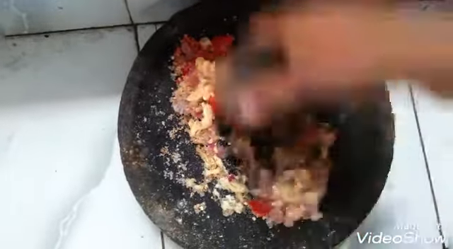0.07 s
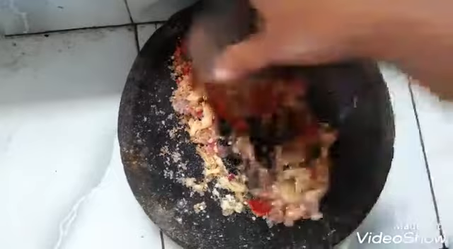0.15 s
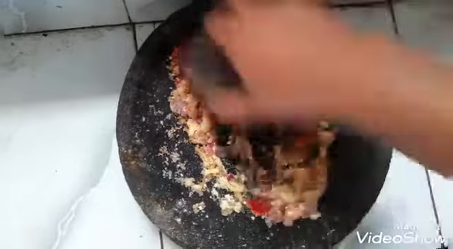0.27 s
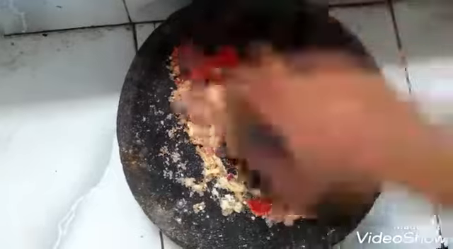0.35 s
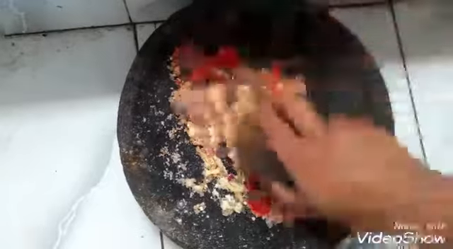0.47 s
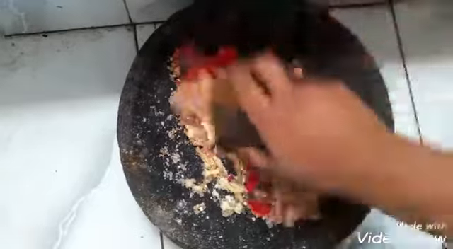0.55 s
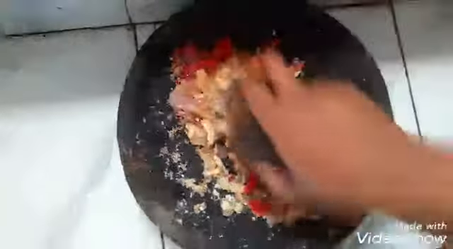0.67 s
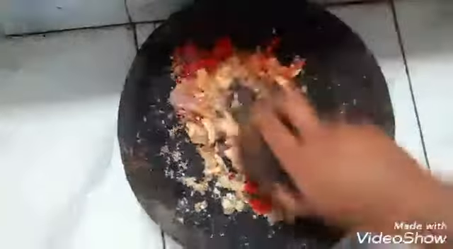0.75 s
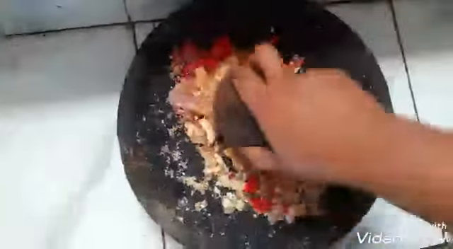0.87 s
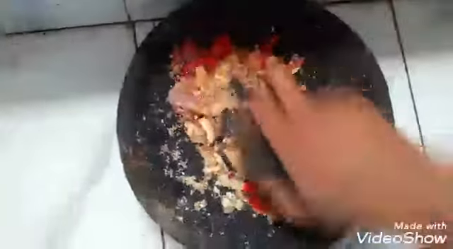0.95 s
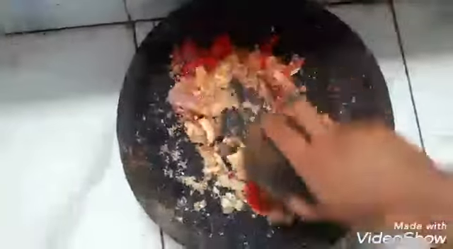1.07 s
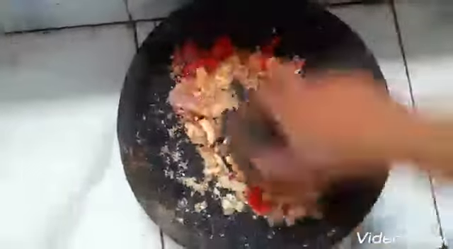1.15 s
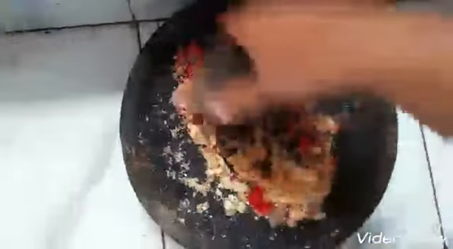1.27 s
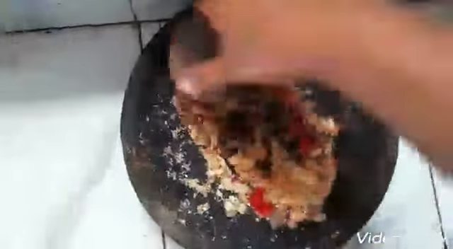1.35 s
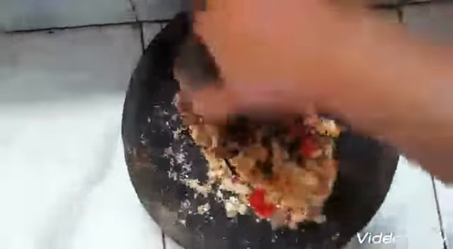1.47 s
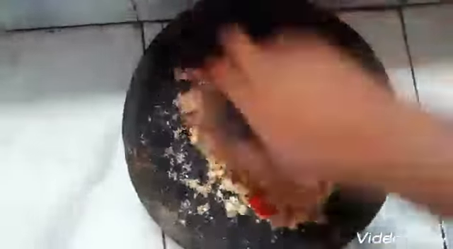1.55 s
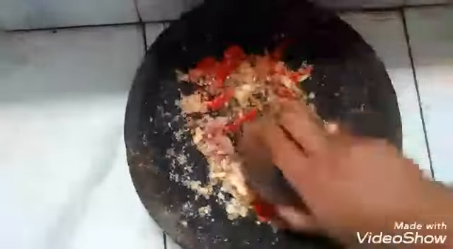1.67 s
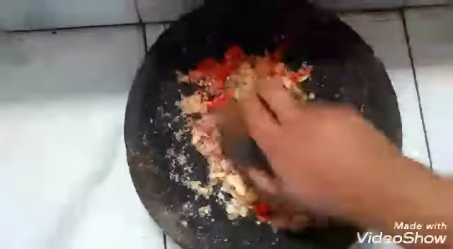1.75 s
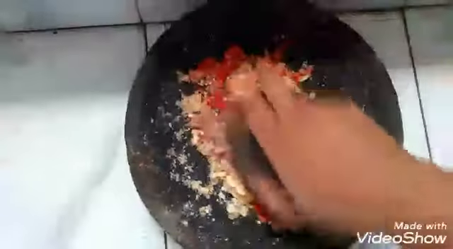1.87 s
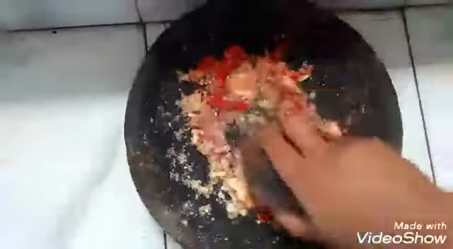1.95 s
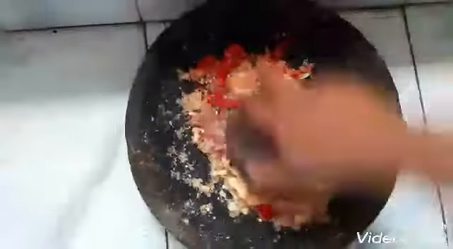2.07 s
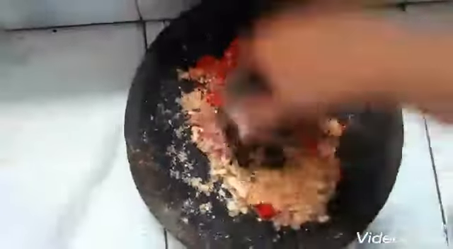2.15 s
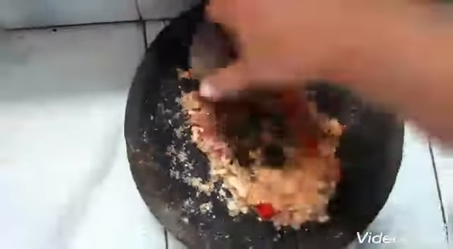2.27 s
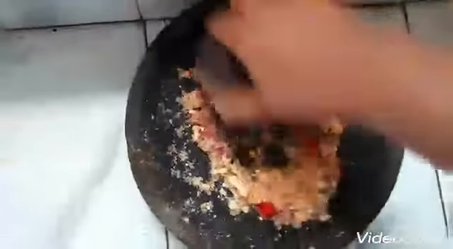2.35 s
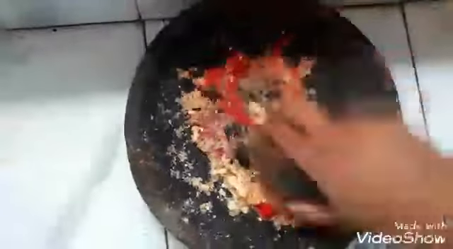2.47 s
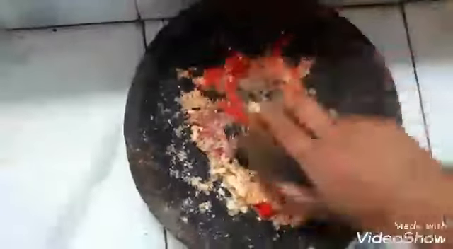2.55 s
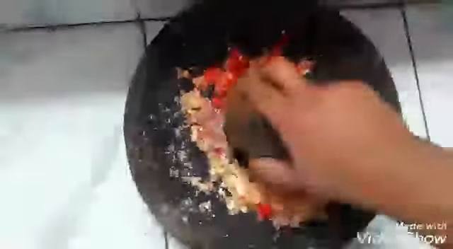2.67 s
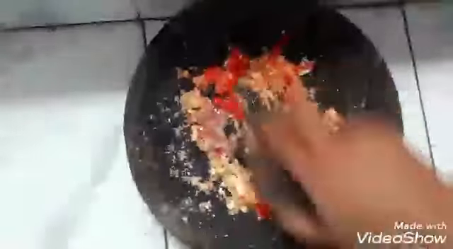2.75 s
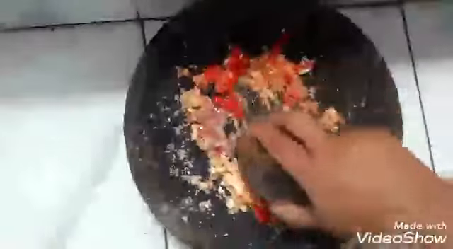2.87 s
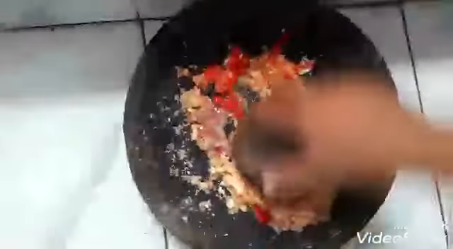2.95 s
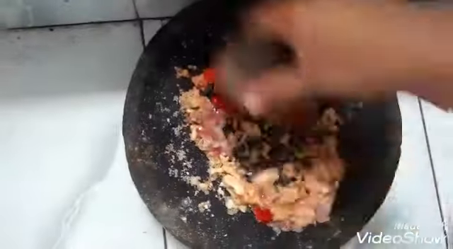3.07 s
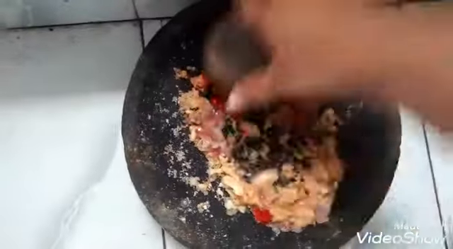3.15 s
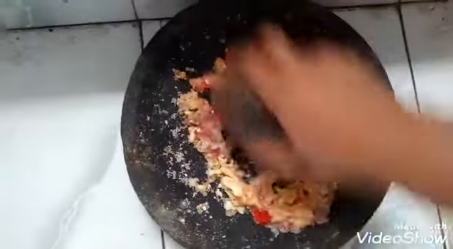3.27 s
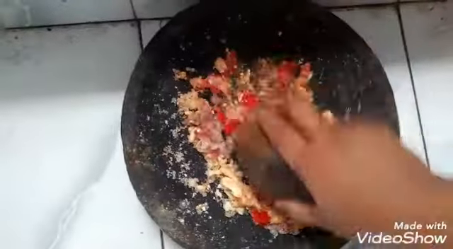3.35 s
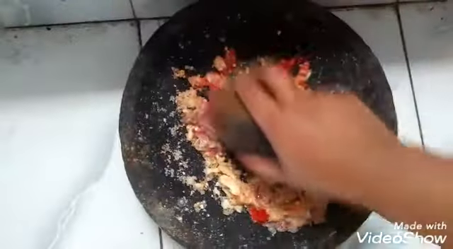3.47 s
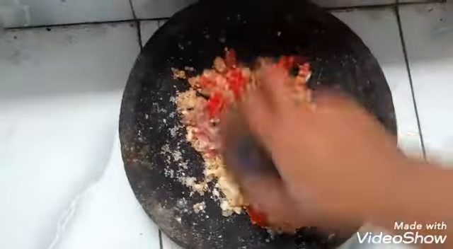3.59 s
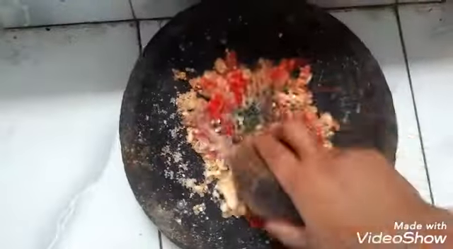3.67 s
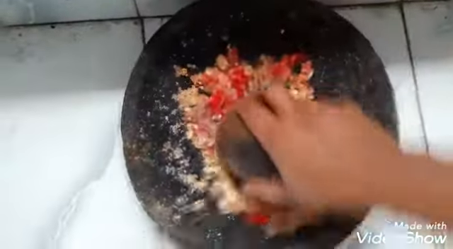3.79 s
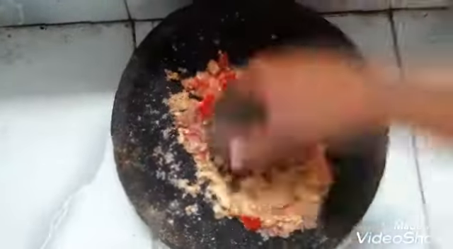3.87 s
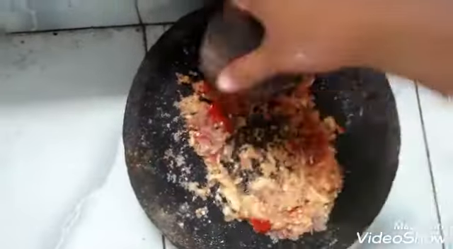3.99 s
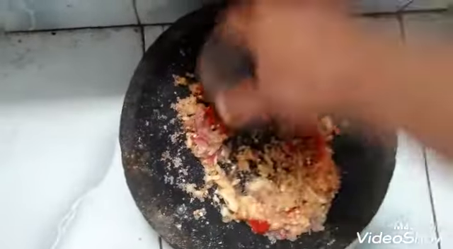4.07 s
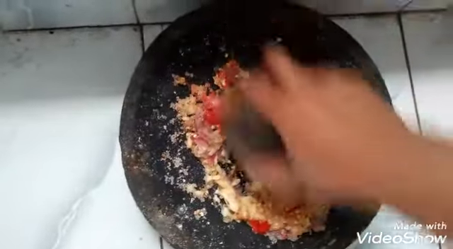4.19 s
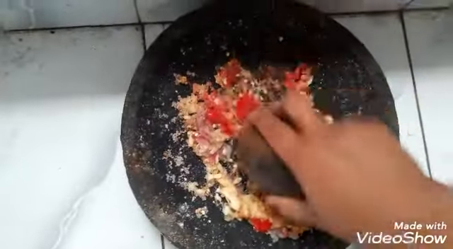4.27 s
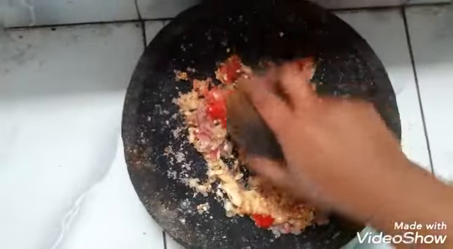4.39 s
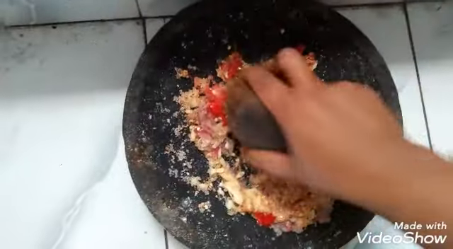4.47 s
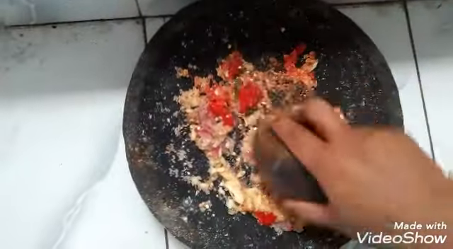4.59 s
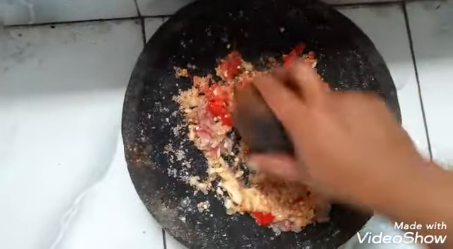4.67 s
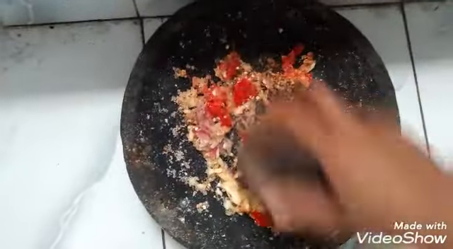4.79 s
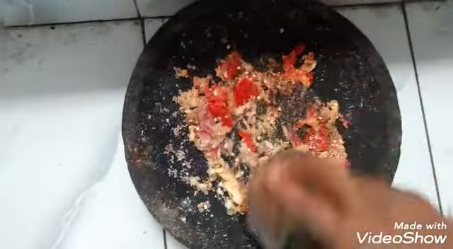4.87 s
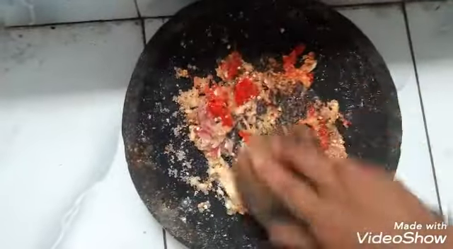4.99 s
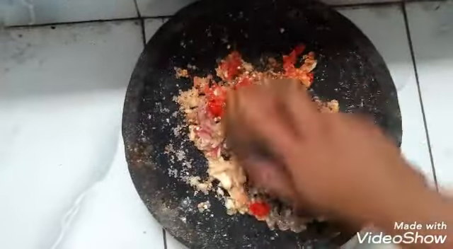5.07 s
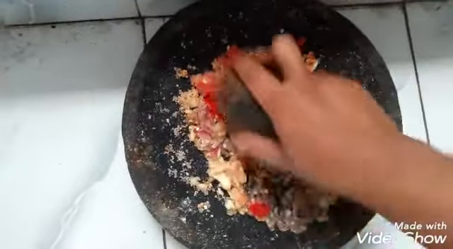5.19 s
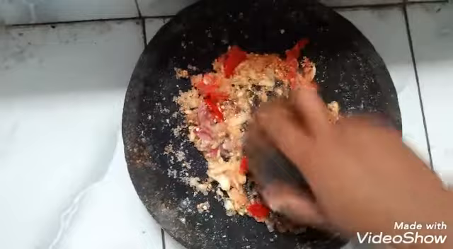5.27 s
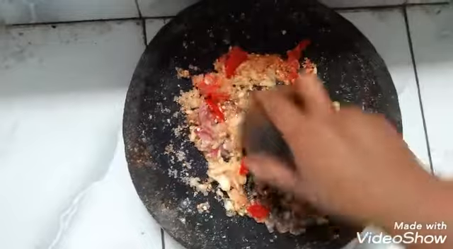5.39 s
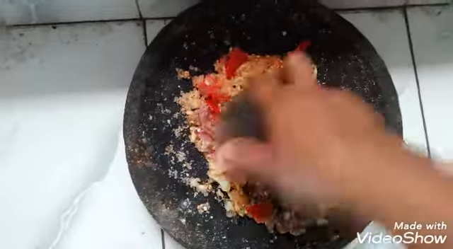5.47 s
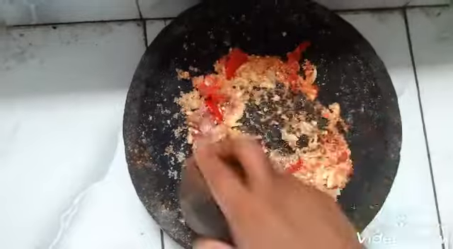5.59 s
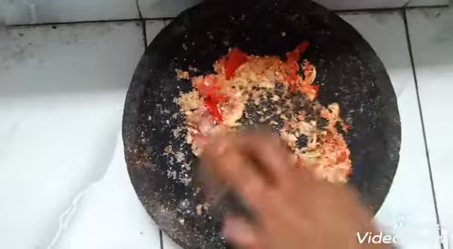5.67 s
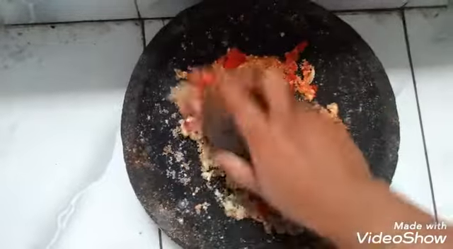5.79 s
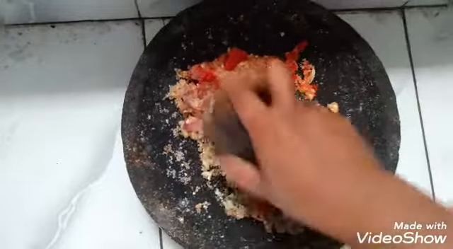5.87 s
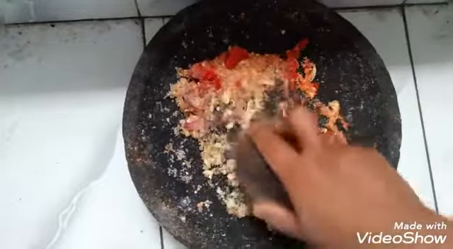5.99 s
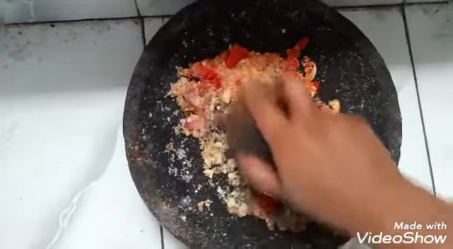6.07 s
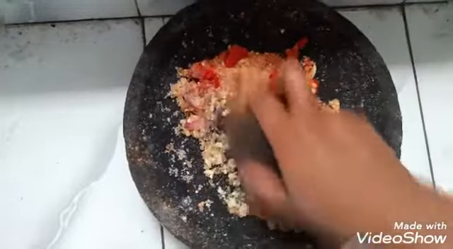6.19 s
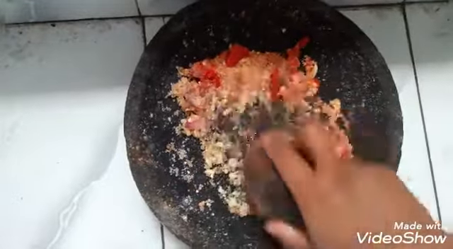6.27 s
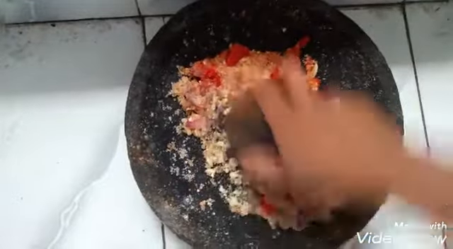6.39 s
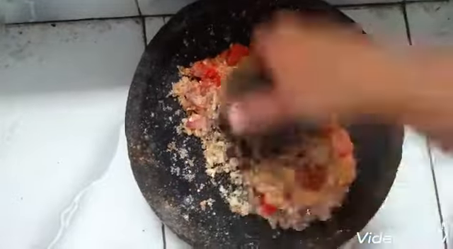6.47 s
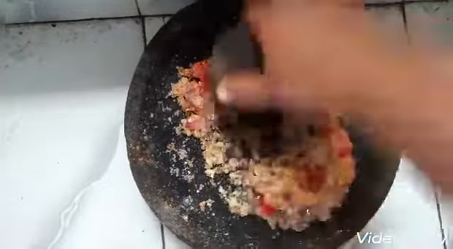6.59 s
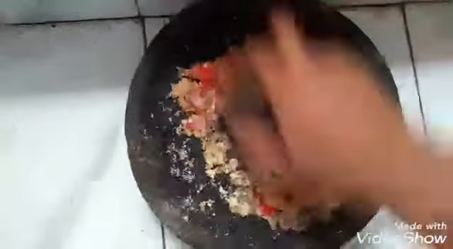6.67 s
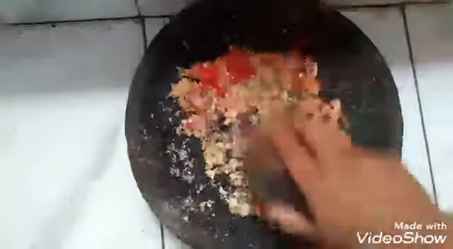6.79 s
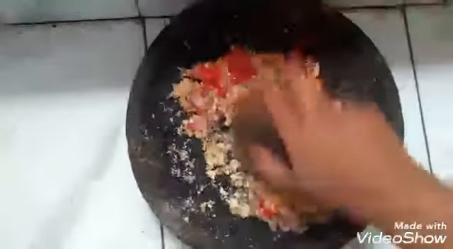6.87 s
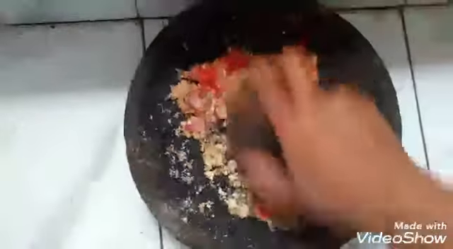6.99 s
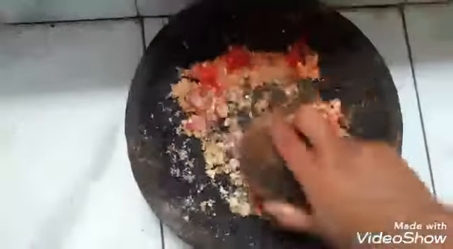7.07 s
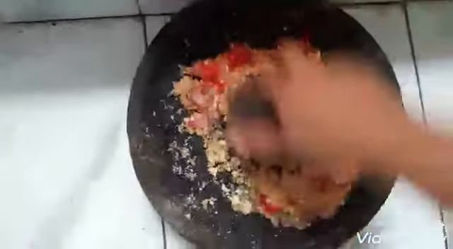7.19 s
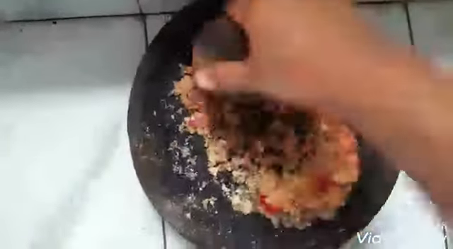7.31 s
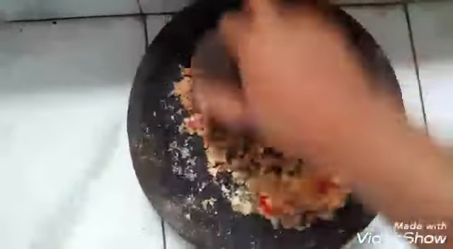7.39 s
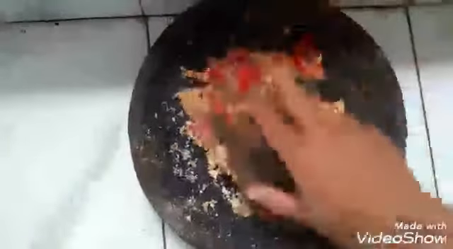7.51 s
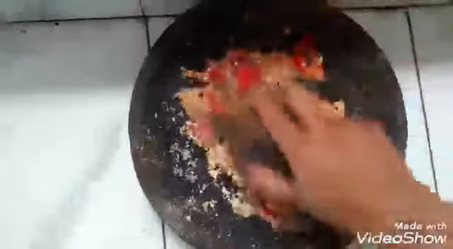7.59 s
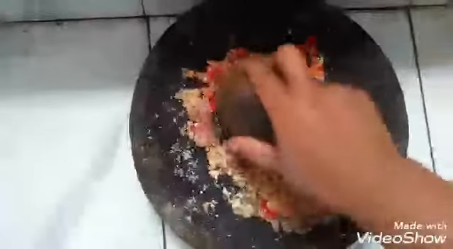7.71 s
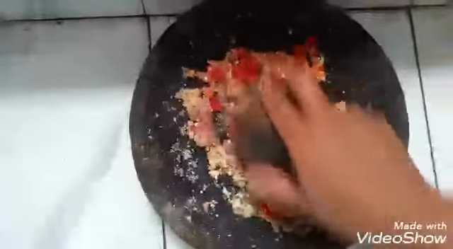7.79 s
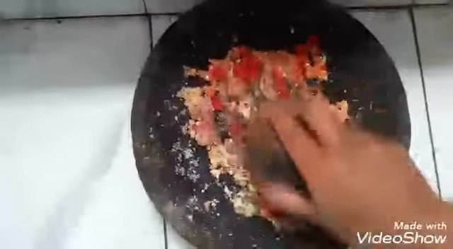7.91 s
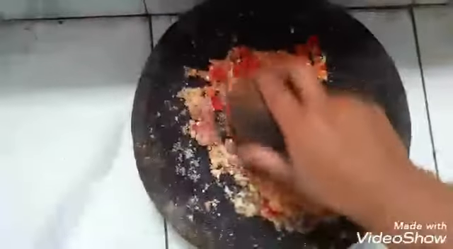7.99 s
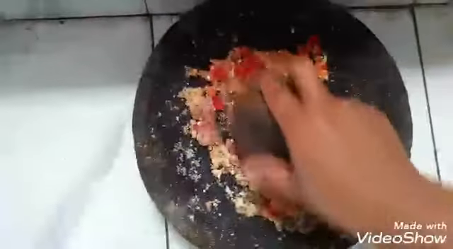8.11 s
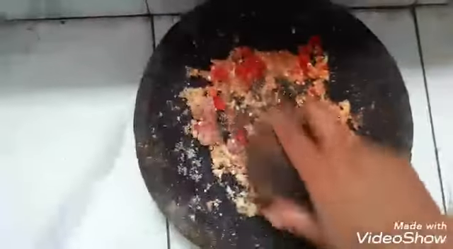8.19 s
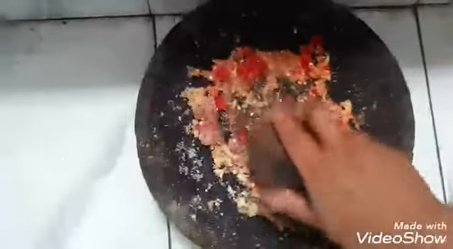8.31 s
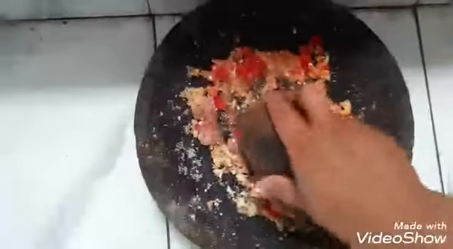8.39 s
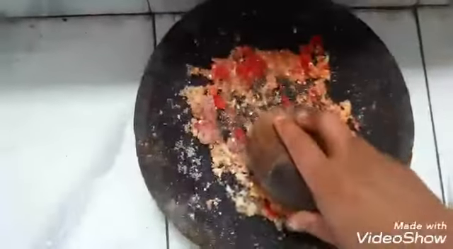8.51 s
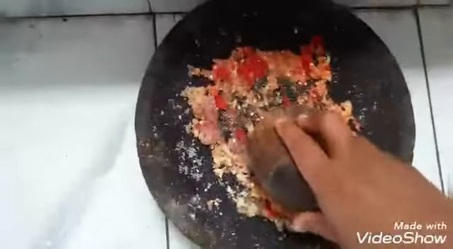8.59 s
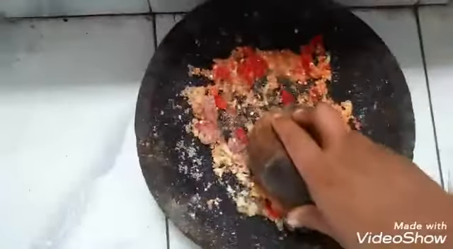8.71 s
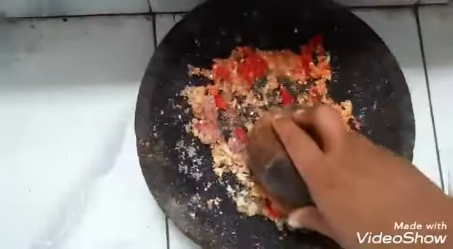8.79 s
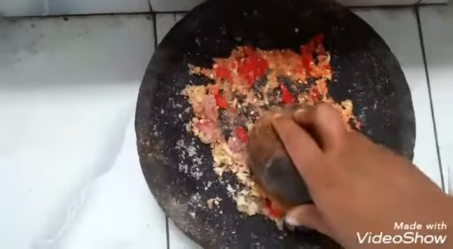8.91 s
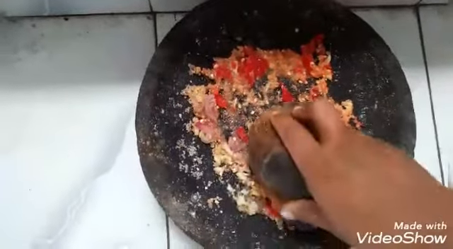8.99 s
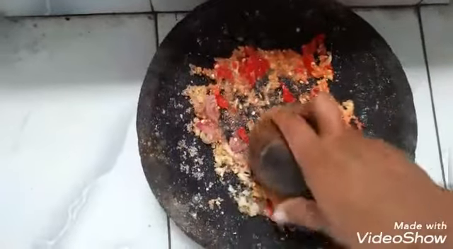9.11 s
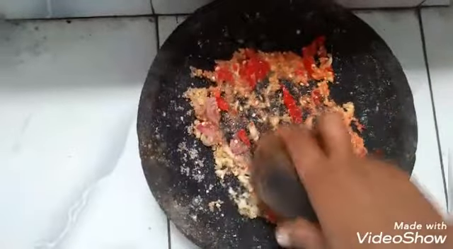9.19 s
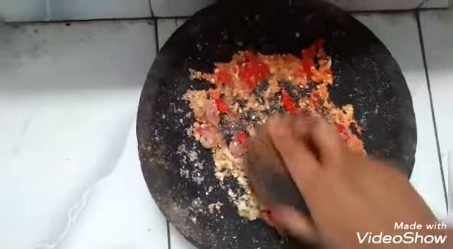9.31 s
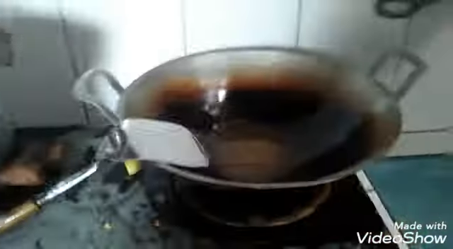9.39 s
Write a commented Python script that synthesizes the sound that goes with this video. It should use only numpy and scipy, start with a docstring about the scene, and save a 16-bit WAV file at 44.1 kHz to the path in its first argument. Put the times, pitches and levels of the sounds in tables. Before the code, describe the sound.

Close by, a hand-held stone pestle drags over a flat stone mortar on a tiled floor. Gritty rasping strokes start at once, several per second, mixed with short dull knocks and tiny cracking seeds. The uneven rhythm continues until about 8.5 seconds, then fades to faint scrapes. A wavering distant engine and thin hiss lie underneath, in a small, lightly reverberant room.

```python
"""A stone pestle grinds chilies on a flat stone mortar that stands on a tiled floor, heard from close by.
From the start a far engine (wavering hum over band noise) and a faint hiss lie under everything. The pestle
drags at once: random grains rasp, fizz and drive the mortar's modes. Then come dull knocks (short contacts
ringing those modes) and cracking seeds (crunch bursts with a short ring), repeating until, after some 8.5 s,
the grinding weakens; the hiss dips briefly near 9.1 s. The recorder limits the knocks."""
import sys
import numpy as np
from scipy import signal
from scipy.fft import rfft, irfft
from scipy.io import wavfile
from scipy.ndimage import uniform_filter1d, minimum_filter1d

SR = 44100
rng = np.random.default_rng(int(sys.argv[2]) if len(sys.argv) > 2 else 0)


def master_out(mix):
    """Clip the mix to full scale and print it as 16-bit PCM to the path in sys.argv[1]."""
    frames = np.transpose(np.atleast_2d(mix))
    ceiling = np.clip(frames, -1, 1)
    pcm = np.round(ceiling * 32767).astype(np.int16)
    wavfile.write(sys.argv[1], SR, pcm)


N = 416744

# modes of the mortar on the tiles: f/Hz, relative level/dB, t60 when ringing freely/s
MORTAR_MODES = [(45, -37.5, 0.029), (173, -20, 0.086), (241, -17, 0.064), (295.3, -16, 0.098),
                (422.7, -14, 0.07), (440, -5, 0.072), (550, -8.5, 0.12), (587, -5, 0.13), (702, -6, 0.059),
                (737, 1.5, 0.058), (901, 7.5, 0.043), (971.5, -8, 0.066), (959.6, -1.5, 0.081),
                (1149, 5, 0.014), (1356, 1.5, 0.049), (1398.4, 5.5, 0.047), (1443, 4, 0.072),
                (1506, -7.5, 0.069), (1620, -35, 0.018), (1805, -7.5, 0.009), (2072, -19.5, 0.09),
                (2290, -20, 0.012), (2615, -22.5, 0.014), (3200, -11, 0.0094), (3150, -43, 0.056)]


def from_db(db):
    """Level to amplitude: 20 dB make a factor of ten."""
    return 10 ** (np.asarray(db) / 20)


def rms_one(x):
    """Normalisation of mean power: scale to rms 1."""
    return x / np.sqrt(np.mean(x ** 2) + 1e-20)


def at_hz(points, hz):
    """Logarithmic frequency scale: read levels in dB between the points of a spectrum."""
    point_hz, level_db = np.array(points)[:, 0], np.array(points)[:, 1]
    return np.interp(np.log(hz), np.log(point_hz), level_db)


def in_time(rows):
    """Linear interpolation: each column of a curve at every sample."""
    s, *columns = np.transpose(rows)
    return [np.interp(np.arange(N) / SR, s, column) for column in columns]


def drift(rate_hz):
    """Low-passed chance: noise twice through a one-pole filter, computed every 20 samples; rms 1."""
    pole = np.exp(-40 * np.pi * rate_hz / SR)
    noise = rng.standard_normal(N // 20 + 2002)
    slow = signal.lfilter([1], [1, -2 * pole, pole * pole], noise)[2000:]   # the filter has settled
    return np.interp(np.arange(N) / 20, np.arange(len(slow)), rms_one(slow))


def ring(clicks, hz, t60):
    """Damped resonator: a unit click sets off a decaying sine of initial height 1."""
    radius, angle = from_db(-60 / (t60 * SR)), 2 * np.pi * hz / SR
    feedback = [1, -2 * radius * np.cos(angle), radius * radius]
    return signal.lfilter([0, np.sin(angle)], feedback, clicks + 1e-18)


def grains(per_s, spread_db):
    """Poisson-like impulse noise: random clicks of uneven size and sign; rms 1."""
    sizes = from_db(spread_db * np.minimum(rng.exponential(1, N), 5)) * rng.choice([-1, 1], N)
    return rms_one(sizes * (rng.random(N) < per_s / SR))


def coloured(x, spectrum, patchy_db):
    """Filter bank: bands of about a third octave, each with its level and its own flicker; rms 1."""
    low_end, high_end = spectrum[0][0], spectrum[-1][0]
    count = int(3 * np.log2(high_end / low_end)) + 2
    edges = np.geomspace(low_end, min(high_end, .45 * SR), count)
    out = 0
    for k, (low, high) in enumerate(zip(edges, edges[1:])):
        band = signal.sosfilt(signal.butter(2, [low, high], "band", fs=SR, output="sos"), x)
        level_db = at_hz(spectrum, np.sqrt(low * high)) + patchy_db * drift(7.6)
        out = out + (-1) ** k * band * from_db(level_db)
    return rms_one(out)


def far_engine():
    """Harmonic and noise radiation: partials of a wavering hum over a low coloured rumble."""
    # the engine's course: t/s, hum f/Hz, hum level/dB, rumble level/dB
    engine_course = [(0.0, 84, -73, -67), (0.23, 101.8, -62.5, -65.5), (0.63, 94, -53, -60),
                     (1.02, 100, -60, -61), (1.92, 91.5, -68.5, -73), (2.13, 103.6, -74, -63),
                     (2.47, 92.7, -79, -61), (2.68, 103.3, -58, -58), (2.84, 93.2, -68.5, -65),
                     (3.39, 95.4, -53, -60), (3.5, 100, -74, -64.5), (4.16, 87.3, -56.5, -55.5),
                     (4.74, 86.8, -69, -67.5), (7.27, 93.6, -74.5, -70), (7.82, 86.7, -70, -61),
                     (8.08, 93.6, -63, -65.5), (9.29, 86.1, -68, -66.5), (9.45, 93.6, -89, -76)]
    # partials of the hum: multiple of the hum frequency, mean level/dB
    hum_partials = [(1, 1.5), (1.5, -4.5), (2, -16.5)]
    # far rumble: f/Hz, level per Hz/dB
    ambient_spectrum = [(25, 0), (60, -20.5), (90, 4), (115, 1), (140, 9.5), (170, 5.5), (220, -10.5),
                        (350, -12.5), (800, -24), (2600, -25), (4500, -55)]
    hum_hz, hum_db, rumble_db = in_time(engine_course)
    phase = 2 * np.pi * np.cumsum(hum_hz * (1 + .03 * drift(5))) / SR
    hum = sum(from_db(level_db + 5 * drift(7)) * np.sin(multiple * phase)
              for multiple, level_db in hum_partials)
    low_noise = coloured(rng.standard_normal(N), ambient_spectrum, patchy_db=1.0)
    return from_db(hum_db) * hum + from_db(rumble_db) * low_noise


def faint_hiss():
    """Broadband noise: a coloured treble whose level follows a curve."""
    # hiss: f/Hz, level per Hz/dB
    hiss_spectrum = [(6500, -42), (8200, -11), (9500, 2), (12000, -7.5), (13000, -20)]
    # its course: t/s, level/dB
    hiss_course = [(0, -65.5), (4, -64), (8.5, -62), (8.9, -69), (9.1, -84.5), (9.3, -64), (9.45, -69.5)]
    return from_db(*in_time(hiss_course)) * coloured(rng.standard_normal(N), hiss_spectrum, patchy_db=2)


def drag():
    """Sliding friction: grit, rasp and rumbling follow the leaning half-sine speed of every stroke."""
    # pushes, pulls and brief skids of the pestle: start t/s, length/s,
    # then at full speed: fine grit level/dB, rasp level/dB, mortar rumbling level/dB
    stroke_table = [(-0.025, 0.073, -41.5, -34, -36), (0.013, 0.18, -46, -40, -45.5),
                    (0.038, 0.2, -58.5, -47.5, -40.5), (0.344, 0.036, -52, -41.5, -34.5),
                    (0.383, 0.26, -43, -39, -38.5), (0.47, 0.042, -31.5, -37, -48),
                    (0.61, 0.16, -37.5, -35, -34.5), (0.778, 0.15, -40.5, -33, -35),
                    (0.933, 0.16, -40.5, -36, -29), (1.099, 0.14, -36, -31, -37.5),
                    (1.208, 0.2, -43.5, -39.5, -38), (1.376, 0.043, -72, -67, -54),
                    (1.536, 0.032, -48.5, -51, -31), (1.62, 0.255, -38.5, -37, -34.5),
                    (1.78, 0.054, -32, -28.5, -44.5), (1.837, 0.21, -42, -36, -36.5),
                    (1.954, 0.048, -32, -35.5, -43.5), (2.025, 0.15, -39, -31.5, -32.5),
                    (2.149, 0.14, -41, -36, -35.5), (2.428, 0.091, -57, -51, -39),
                    (2.433, 0.016, -41.5, -57, -39), (2.503, 0.225, -38.5, -36, -40.5),
                    (2.702, 0.158, -37, -35, -31.5), (2.783, 0.029, -29.5, -32, -38),
                    (2.848, 0.16, -43, -38, -45), (2.99, 0.16, -46.5, -39.5, -38),
                    (3.294, 0.056, -49, -41, -35), (3.344, 0.099, -52, -50, -30.5),
                    (3.39, 0.2, -39.5, -33, -41.5), (3.577, 0.14, -40, -33, -30),
                    (3.726, 0.14, -38, -33.5, -36), (3.844, 0.2, -44, -38.5, -32.5),
                    (3.991, 0.043, -46, -49, -50), (4.164, 0.033, -66.5, -44, -36.5),
                    (4.213, 0.27, -42, -36.5, -37.5), (4.458, 0.17, -41.5, -35.5, -35.5),
                    (4.645, 0.14, -41, -35.5, -41), (4.75, 0.19, -39.5, -34.5, -37),
                    (4.925, 0.071, -56, -54, -47), (5.079, 0.055, -61, -54.5, -20),
                    (5.153, 0.046, -47, -41.5, -46), (5.176, 0.21, -41.5, -39.5, -34),
                    (5.293, 0.032, -42.5, -52, -47.5), (5.381, 0.18, -43.5, -38.5, -38),
                    (5.523, 0.16, -42.5, -36, -35), (5.767, 0.033, -51, -41.5, -46.5),
                    (5.792, 0.26, -46, -37, -33.5), (5.878, 0.16, -44.5, -60, -45),
                    (6.036, 0.181, -44, -36, -40.5), (6.197, 0.14, -39, -31.5, -30),
                    (6.345, 0.14, -40.5, -34, -33.5), (6.494, 0.13, -41.5, -34, -31),
                    (6.738, 0.071, -46.5, -40.5, -45.5), (6.827, 0.16, -39.5, -35.5, -34),
                    (6.976, 0.16, -44, -37, -35.5), (7.138, 0.14, -41.5, -34, -34),
                    (7.277, 0.14, -43, -35, -34), (7.487, 0.27, -45, -39.5, -45),
                    (7.5, 0.02, -44, -43.5, -28), (7.615, 0.08, -42, -40, -42),
                    (7.728, 0.16, -41, -34.5, -34.5), (7.894, 0.16, -47, -35.5, -43.5),
                    (8.082, 0.12, -41.5, -31.5, -35), (8.221, 0.2, -48, -40, -51.5),
                    (8.429, 0.13, -50, -46.5, -35), (8.55, 0.27, -66, -56.5, -66),
                    (8.673, 0.067, -62, -53, -71), (8.803, 0.075, -73, -64, -51),
                    (8.88, 0.25, -94, -70, -66), (9.173, 0.055, -65, -52.5, -54.5),
                    (9.301, 0.16, -58, -49.5, -67)]
    speed_power = 1.2   # amplitude follows the speed of the stroke to this power
    onset_skew = 0.97   # below 1 the stroke reaches full speed before its middle
    power = np.full((3, N), 1e-10)
    for start, length, *levels_db in stroke_table:
        i = np.arange(max(round(start * SR), 0), min(round((start + length) * SR), N))
        progress = np.clip((i / SR - start) / length, 0, 1)
        speed = np.sin(np.pi * progress ** onset_skew)
        power[:, i] += (from_db(levels_db)[:, None] * np.abs(speed) ** speed_power) ** 2
    return 10 * np.log10(power)


def contact():
    """Stick-slip contact: the bite of the stones clumps slowly and bursts at each slip, then relaxes."""
    slips = (rng.random(N) < 40 / SR) * rng.exponential(1, N)
    bursts = signal.lfilter([1], [1, -np.exp(-1 / (0.003 * SR))], slips)   # time constant 3 ms
    return from_db(1.4 * drift(39)) * (1 + 0.6 * bursts)


def rumble(catches, rumble_db):
    """Forced modal vibration: the dragged pestle drives the mortar, damped under the pressing hand."""
    rubbed = sum((-1) ** m * from_db(0.71 * level_db + 4.04 * drift(8.3)) * ring(catches, hz, .5 * t60)
                 for m, (hz, level_db, t60) in enumerate(MORTAR_MODES))
    return from_db(rumble_db) * rms_one(rubbed)


def rasp(catches, rasp_db, bright_db):
    """Excited resonance: coarse grains catch on rough stone and ring the pestle; crisp bits brighten it."""
    # rasp: f/Hz, level per Hz/dB
    rasp_spectrum = [(1000, -2), (1600, 2.5), (2200, 12), (2800, -14.5), (3300, 8.5), (4200, -52.5),
                     (5200, -58), (6500, -43)]
    # the pestle's ring in the rasp: f/Hz, bandwidth/Hz, mean level/dB
    pestle_ring = (2650, 150, -0.85)
    hz, width, ring_db = pestle_ring
    t60 = np.log(1000) / (np.pi * width)
    tone = rms_one(ring(catches, hz, t60)) * from_db(ring_db + 3.3 * drift(5.6))
    coarse = rms_one(coloured(catches, rasp_spectrum, patchy_db=4.5) + tone)
    crisp_band = signal.butter(2, [3100, 4600], "band", fs=SR, output="sos")
    crisp = rms_one(signal.sosfilt(crisp_band, catches))
    return from_db(rasp_db) * coarse + from_db(rasp_db + bright_db) * crisp


def grit(bite, crackle, grit_db):
    """Dense impact noise: fine particles fizz between the stones."""
    # grit: f/Hz, level per Hz/dB
    grit_spectrum = [(2710, -5.5), (4600, -21), (6090, 1.5), (7240, 5.5), (8560, 2.5), (13700, 5),
                     (14700, -16), (15000, -55)]
    particles = bite * (grains(15000, spread_db=3.0) + crackle)
    return from_db(grit_db) * coloured(particles, grit_spectrum, patchy_db=3.5)


def knocks():
    """Impact on a modal body: soft contact and chatter; grip and place shift the modes at every blow."""
    # pestle on stone: t/s, peak level/dB, lift of modes at 350-720 Hz/dB, lift of modes at
    # 1200-1700 Hz/dB, chatter time/ms
    blow_table = [(0.055, -12.5, 1, 8.5, 4.7), (0.065, -2, -11.5, 7, 4), (0.177, -16, 5, -1, 4.3),
                  (0.201, -10.5, -0.5, 5, 3.5), (0.34, -25.5, 4, -4, 1.9), (0.347, -4, 1, -1, 3.1),
                  (0.355, -7, -11.5, -5.5, 3), (0.488, -23, 10, 4, 2.3), (0.627, -8.5, 5.5, 7.5, 1.9),
                  (0.716, -10.5, 4, -3.5, 2.4), (0.922, -12, 9, 8.5, 7.6), (0.932, -6, -1, 9.5, 3.6),
                  (0.958, -16, 1, 0.5, 3.3), (1.041, -17, -1, 3.5, 1.1), (1.233, -12, -0.5, 7, 3.7),
                  (1.244, -1.5, -3, 10.5, 3), (1.354, -22, 5, -2, 3.3), (1.549, -27, 8, 8, 2.6),
                  (1.79, -19.5, 9, 14, 2.3), (1.889, -14, 2, 7, 2.3), (1.898, -3.5, 3, 8.5, 2.2),
                  (1.914, -12.5, 6, 7.5, 2.1), (1.969, -20, -3, 12, 3.3), (2.065, -22.5, 2.5, 9.5, 4.1),
                  (2.155, -9.5, 6.5, 9.5, 2.3), (2.194, -18, 4, 8.5, 6.4), (2.441, -7.5, 0.5, 7, 3.5),
                  (2.448, -1.5, -7.5, 0, 2.6), (2.606, -20, 2, 1, 3), (2.62, -12.5, 7, 7, 3.4),
                  (2.656, -26, 12, 9, 3.5), (2.702, -19, 10, 6, 2.7), (2.709, -16, 8, 5, 3),
                  (2.76, -12.5, 7, 5.5, 2), (2.793, -19.5, -7, -2, 3), (2.823, -20.5, 7.5, 6, 2.5),
                  (2.95, -12.5, 12, 8, 3), (2.96, -2, -7, -2, 3.7), (2.993, -12.5, 1, -1.5, 2.8),
                  (3.272, -25.5, 11, 0, 3.3), (3.278, -11.5, 7, -2, 3), (3.287, -9.5, 1, 4, 2.5),
                  (3.303, -15, 2, 4, 3), (3.317, -7.5, -5, 11, 3), (3.493, -18.5, 12, 12, 3.2),
                  (3.603, -21.5, 11, -7, 4.9), (3.61, 2, 3.5, 0, 3.8), (3.763, -22, -8, 9, 2.7),
                  (3.778, -13.5, 3.5, 7.5, 3.7), (3.881, -6.5, -2, 8.5, 1.9), (3.919, -7, 3, 3.5, 3.3),
                  (3.934, -5, 1, 6, 2.6), (3.954, 5, -2, 3, 2.8), (4.161, -18.5, 16, -1, 3),
                  (4.167, 1, -4.5, 1, 2.2), (4.176, -4.5, -12, 7.5, 2.2), (4.279, -19.5, -1, 7, 3),
                  (4.386, -22, 9.5, 8, 4.5), (4.536, -20, -14, 2, 3), (4.79, -18, 1.5, 13.5, 3),
                  (4.798, -7, 9.5, 12.5, 3.6), (4.806, -17.5, 6, 5, 1.9), (4.812, -12.5, 0, 5, 2.8),
                  (4.833, -30, -11, 6.5, 3), (5.089, -13, 4, 7, 3), (5.106, -4, -7, 2.5, 2),
                  (5.115, -10.5, -3, 7, 3.2), (5.17, -13.5, -3, 2, 4.5), (5.25, -23.5, -9, -5, 3.5),
                  (5.257, -19, 4, -10, 3), (5.358, -15.5, 7, 8.5, 1.5), (5.494, -13.5, 4.5, 10.5, 3),
                  (5.501, -8.5, 8.5, -1, 2.2), (5.521, -14, 11.5, 14.5, 2.2), (5.544, -8.5, -2, 3, 2),
                  (5.796, -4.5, 1, 8, 4.5), (6.025, -14, 2.5, 3, 2.8), (6.035, -26, 9, 7, 3),
                  (6.178, -11, 8, 9, 2.5), (6.184, -2, -3, 7, 3.3), (6.221, -16, -5, 17, 2.1),
                  (6.443, -15.5, 5.5, 14.5, 3.8), (6.455, -5.5, -1, 8, 2.9), (6.479, -18, 10, 1, 3),
                  (6.499, -16, 2, -24, 4.1), (6.764, -28.5, 0, 15, 3), (6.786, -7, 3.5, 3, 3.2),
                  (6.804, -15.5, 2, 11, 4), (6.946, -13, -11, 20, 3), (6.955, -3, 1.5, 5.5, 1.7),
                  (7.102, -21.5, 6, 2, 2), (7.265, -13.5, 11, 12, 2.4), (7.312, -14, 17, 16, 3),
                  (7.33, -21, 6, 2, 3), (7.508, -20, -2, 4, 3), (7.522, -6, 2, 4.5, 2.3),
                  (7.75, -18.5, 10.5, 12.5, 2.1), (7.842, -20.5, 4, 2, 3), (8.107, -10, -3.5, 4, 3),
                  (8.115, -7, 3.5, 8.5, 3.4), (8.455, -16, 4, 9, 1.7), (8.482, -7.5, 2, 9, 4.6),
                  (8.488, -14, -5, 16, 2.1), (8.801, -27, 9, 9.5, 2.3), (8.832, -28, 8, 11.5, 2.2),
                  (8.854, -37, 3, 4, 3), (8.87, -35, 17, 9, 3), (8.943, -42.5, 5, 3, 3.5),
                  (8.983, -48, 7, 7, 3.6), (9.189, -44.5, 3, -9, 3)]
    thud_db, crack_db = 2.5, 2.5   # lift of the modes below 350 Hz and above 1700 Hz
    ringing = 0.53   # share that rings on freely
    t = np.arange(int(.3 * SR))[:, None] / SR
    hz, level_db, t60 = np.transpose(MORTAR_MODES)
    rattle = rng.standard_normal((len(blow_table), 2000))
    place = rng.standard_normal((len(blow_table), 2, len(MORTAR_MODES)))
    soft = signal.butter(2, 3000, fs=SR, output="sos")
    lead = int(.008 * SR)
    touch = 0.0092 * np.linspace(0, 1, lead) ** 2   # the paste is squeezed out just before the stones meet
    fade = from_db(-60 * t / 0.014) + ringing * from_db(-60 * t / t60)   # most dies under the hand at once
    out = np.zeros(N + len(t))
    for k, (s, peak_db, low_db, upper_db, chatter_ms) in enumerate(blow_table):
        tilt_db = np.select([hz < 350, hz < 720, hz > 1700, hz > 1200], [thud_db, low_db, crack_db, upper_db])
        share = from_db(level_db + tilt_db + 2 * place[k, 0]) * (-1) ** np.arange(len(hz))
        shifted_hz = hz * (1 + 0.0082 * place[k, 1])
        modes = (share * fade * np.sin(2 * np.pi * shifted_hz * t)).sum(axis=1)
        age = t[:2000, 0] / (chatter_ms / 1000)
        blow = 0.14 * rattle[k] * np.sqrt(age) * np.exp(-age)
        blow[:12] += .1   # the contact itself
        blow = np.concatenate([touch * rattle[k, -lead:], blow])
        knock = signal.fftconvolve(modes, signal.sosfilt(soft, blow))[:len(t)]
        out[round(s * SR) - lead:][:len(t)] += from_db(peak_db) * knock / np.abs(knock).max()
    return out[:N]


def seeds():
    """Brittle fracture: each seed snaps with a few ms of crunch and a short ring."""
    # the loudest seeds crack: t/s, peak level/dB, f/Hz
    seed_table = [(0.092, -30.5, 2800), (0.4931, -23, 2470), (0.5292, -28, 2550), (0.6567, -21, 2670),
                  (0.7105, -18.5, 2680), (0.8168, -23.5, 2630), (1.0585, -26, 2670), (1.194, -26, 3000),
                  (1.2867, -18, 2620), (1.6706, -23, 2620), (1.707, -31.5, 2650), (1.7416, -21, 2520),
                  (1.791, -21, 2460), (1.8023, -15, 2520), (1.917, -22, 2650), (1.958, -17, 2740),
                  (1.9708, -17.5, 2700), (2.0538, -25, 2480), (2.442, -29, 2570), (2.537, -24, 3540),
                  (2.607, -23, 2500), (2.6558, -15, 2470), (3.019, -33, 2630), (3.3192, -19, 2600),
                  (3.415, -30.5, 3640), (3.6115, -17.5, 2710), (3.7514, -26, 2480), (3.8726, -25.5, 2600),
                  (3.9551, -8.5, 2600), (4.1689, -25, 2630), (4.2792, -25, 2500), (4.6618, -28.5, 2380),
                  (4.7203, -23, 2430), (5.1685, -25, 3130), (5.4685, -19.5, 3460), (5.7937, -22.5, 2490),
                  (6.002, -32, 2610), (6.119, -25, 3410), (6.1485, -21.5, 2520), (6.24, -27, 2640),
                  (6.2923, -19, 2680), (6.4194, -18, 2200), (6.5485, -29, 3570), (6.5828, -19.5, 2690),
                  (6.873, -22, 2460), (7.0892, -25, 2630), (7.1746, -20, 2690), (7.2185, -20.5, 2530),
                  (7.3124, -25, 2640), (7.6621, -26.5, 2290), (7.771, -24, 2650), (7.7982, -19, 2770),
                  (7.9773, -20.5, 2350), (8.2666, -23, 2370), (8.6972, -30, 3330), (8.7273, -29, 3550),
                  (9.1895, -35, 2800), (9.3661, -31, 3520)]
    age = np.arange(1000) / 110   # in time constants of 110 samples
    out = np.zeros(N + 1000)
    crunch = rng.standard_normal((len(seed_table), 1000)) * np.sqrt(age) * np.exp(-age)
    for (s, peak_db, hz), force in zip(seed_table, crunch):
        snap = ring(force, hz, 0.0096) + 0.65 * np.diff(force, prepend=0)
        out[round(s * SR):][:1000] += from_db(peak_db) * snap / np.abs(snap).max()
    return out[:N]


def room(x):
    """Diffuse reverberation: dense dull reflections that decay exponentially; energy 1."""
    t60_s, wall_cut_hz = 0.3, 6000
    t = np.arange(int(.5 * SR)) / SR
    echoes = rng.standard_normal(len(t)) * from_db(-60 * t / t60_s) * np.minimum(t / 0.0019, 1)
    echoes = signal.sosfilt(signal.butter(1, wall_cut_hz, fs=SR, output="sos"), echoes)
    return signal.fftconvolve(x, echoes / np.linalg.norm(echoes))[:N]


def spread(mid):
    """Mid-side stereo: a side of random sign follows the mid's level; wide treble, the rest central."""
    # stereo width: f/Hz, side level relative to mid/dB
    width_spectrum = [(60, -23), (110, -15.5), (200, -23.5), (370, -24.5), (690, -34), (1270, -46.5),
                      (2330, -37.5), (4280, -22.5), (7880, -4), (14500, -4.5)]
    hz = np.maximum(np.arange(N // 2 + 1) * SR / N, 20)
    side = irfft(rfft(mid) * from_db(at_hz(width_spectrum, hz)), N) * drift(60)
    return np.array([mid + side, mid - side])


def scene():
    """Superposition: stones, seeds and room add to the engine and the hiss."""
    room_db = -14.5
    thin_hz = 491   # so small a stone radiates little below this
    crisp_db, crisp_wander_db = -7.5, 4   # crisp level relative to the rasp, and its swing
    grit_db, rasp_db, rumble_db = drag()
    bright_db = crisp_db + crisp_wander_db * drift(6.1)
    bite = contact()
    crackle = from_db(-8.5) * grains(220, spread_db=3.5)   # sparse bits that burst among the grains
    catches = bite * (grains(6000, spread_db=2.5) + crackle)
    body = knocks() + rumble(catches, rumble_db)
    surface = rasp(catches, rasp_db, bright_db) + grit(bite, crackle, grit_db) + seeds()
    stones = body + surface + from_db(room_db) * room(body + from_db(-1.0) * surface)
    thin = signal.sosfilt(signal.butter(4, thin_hz, "high", fs=SR, output="sos"), stones)
    floor_band = signal.butter(2, [30, 300], "band", fs=SR, output="sos")
    thud = from_db(-11) * signal.sosfilt(floor_band, stones)   # through the floor
    hiss = faint_hiss()
    return spread(thin + thud + far_engine() + hiss)


def record(dry):
    """Peak limiting and band limiting: the gain holds the knocks under a ceiling, then the top is cut."""
    ceiling, cutoff_hz = .5, 14400
    allowed = np.minimum(1, ceiling / (np.abs(dry).max(axis=0) + 1e-9))
    gain = uniform_filter1d(minimum_filter1d(allowed, size=201), size=101)   # sizes in samples
    top_cut = signal.ellip(12, .5, 80, cutoff_hz, fs=SR, output="sos")
    return signal.sosfilt(top_cut, dry * gain)


dry = scene()
out = record(dry)
master_out(out)
```